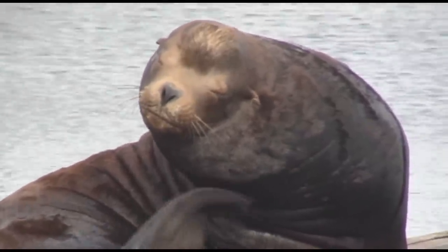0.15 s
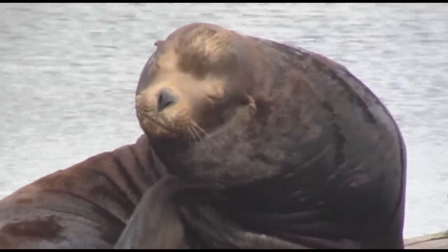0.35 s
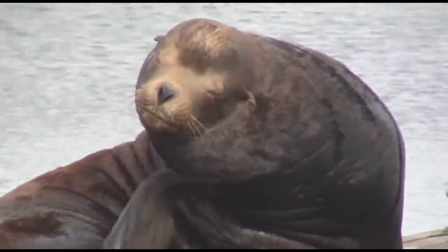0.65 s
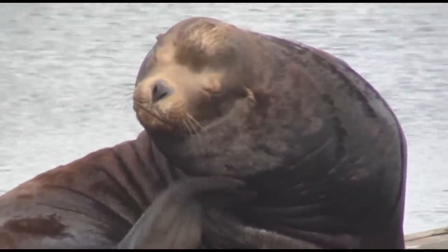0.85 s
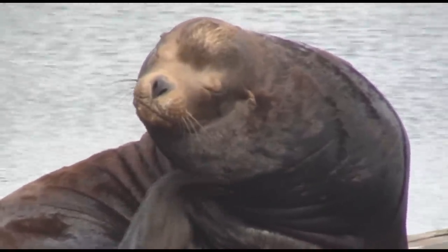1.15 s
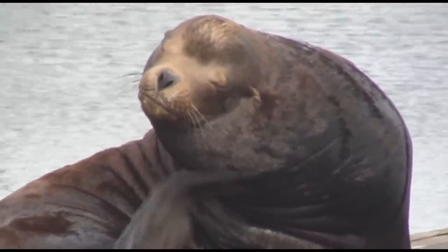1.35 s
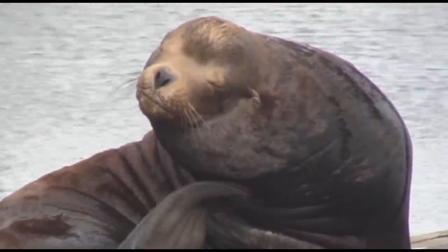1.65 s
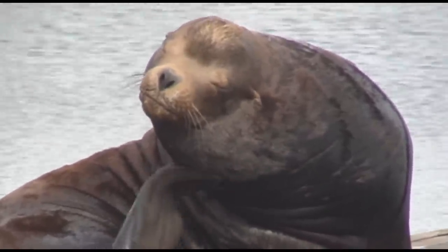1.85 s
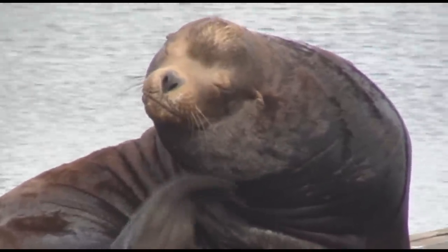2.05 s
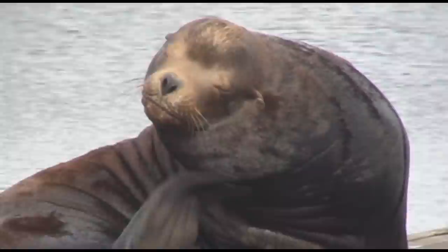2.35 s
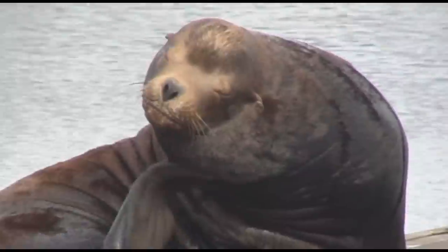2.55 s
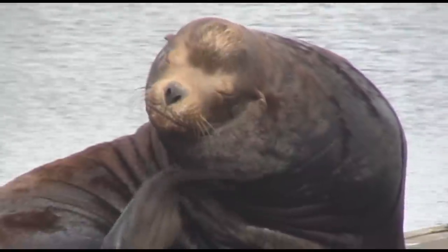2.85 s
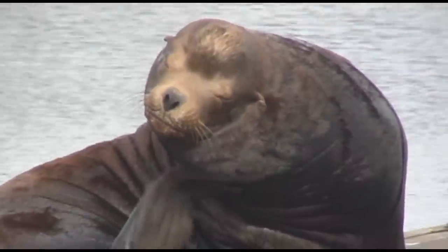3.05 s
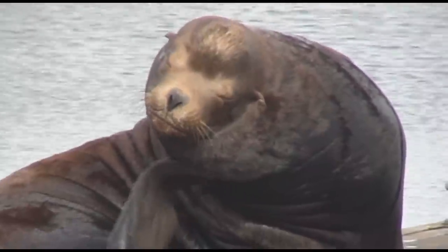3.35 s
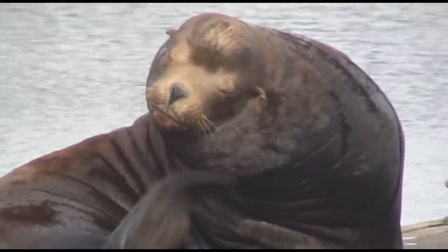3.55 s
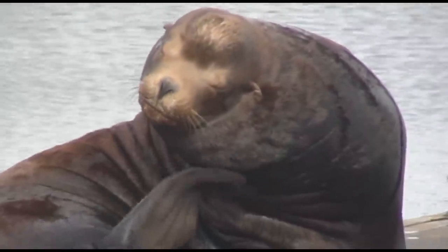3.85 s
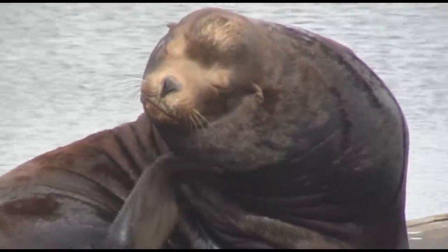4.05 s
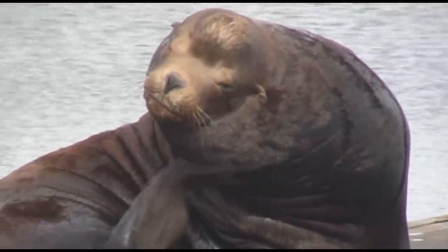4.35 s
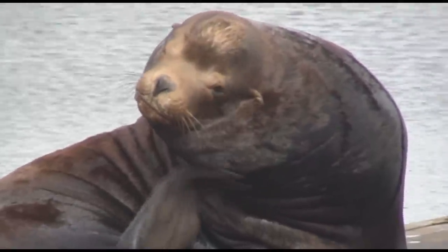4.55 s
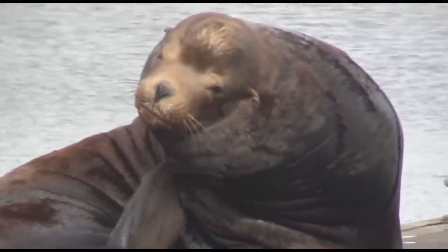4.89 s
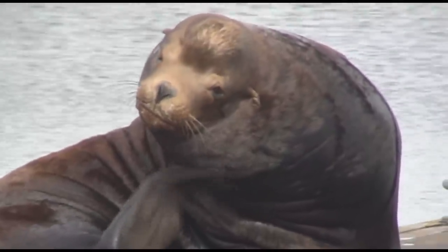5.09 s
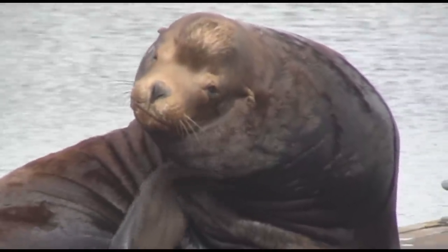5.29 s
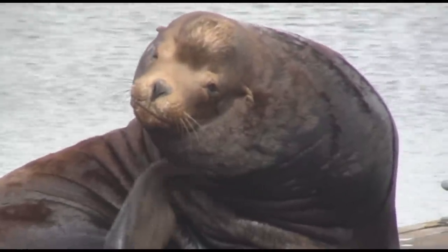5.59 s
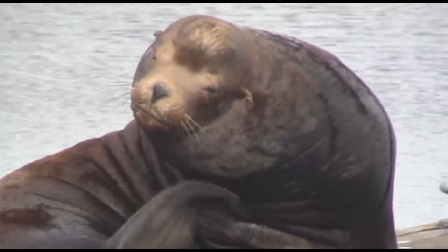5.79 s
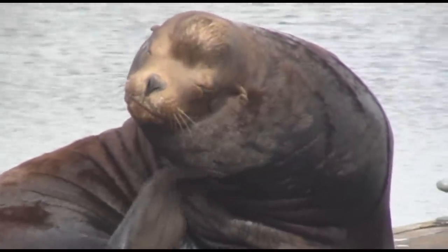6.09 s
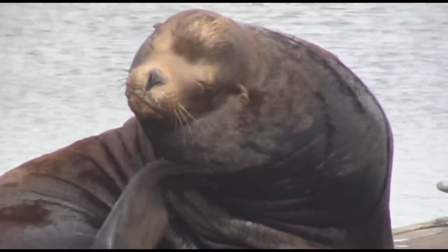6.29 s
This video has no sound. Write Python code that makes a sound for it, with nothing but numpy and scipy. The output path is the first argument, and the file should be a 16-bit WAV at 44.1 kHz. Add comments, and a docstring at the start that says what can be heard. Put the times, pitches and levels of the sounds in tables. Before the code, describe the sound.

A sea lion barks in a rapid, even series, then tires and stops, over a low engine hum and gusty wind.

```python
"""Sea lions in a harbour

A sea lion barks about three times a second, tires and stops; a second answers once from farther off.
Each bark is a rough arch of pitch whose second harmonic sweeps through the throat's main resonance
and echoes over the water. An engine hums, wind buffets the microphone and the open air hisses;
a lens motor whines faintly, the camera body ticks twice, and one soft swish follows the barking."""
import sys
import numpy as np
from scipy import signal
from scipy.fft import rfft, irfft
from scipy.io import wavfile
from scipy.ndimage import uniform_filter1d, map_coordinates

SR = 44100
rng = np.random.default_rng(int(sys.argv[2]) if len(sys.argv) > 2 else 0)


def materialize(psi):
    """Save the field psi as 16-bit PCM at rate SR to the path in sys.argv[1].

    A 1-D psi becomes a single channel; in a 2-D psi each row is a channel.
    """
    bounded = np.clip(np.atleast_2d(psi).T, -1, 1)
    quanta = np.round(bounded * 32767).astype(np.int16)
    wavfile.write(sys.argv[1], SR, quanta)


N = 283412
TIME = np.arange(N) / SR
BIN_HZ = np.arange(N // 2 + 1) * SR / N


def from_db(db):
    """Amplitude ratio of a level in decibels."""
    return 10 ** (np.asarray(db) / 20)


def unit_rms(x):
    """Normalisation to unit mean power."""
    return x / np.sqrt(np.mean(x ** 2) + 1e-20)


def over_time(rows):
    """Linear interpolation of a table's columns between its times."""
    times, *columns = np.transpose(rows)
    return [np.interp(TIME, times, column) for column in columns]


def at_hz(points, hz):
    """Interpolation of a spectrum on a log-frequency axis."""
    knots_hz, values = np.transpose(points)
    return np.interp(np.log(np.maximum(hz, 1)), np.log(knots_hz), values)


def coloured(gain, channels=2):
    """Spectral shaping: independent noises weighted by a gain at each of BIN_HZ, at unit rms."""
    return unit_rms(irfft(rfft(rng.standard_normal((channels, N))) * gain, N))


def drift(rate_hz):
    """Smooth random modulation of unit rms, lying mostly below the given rate."""
    knots = rng.standard_normal(int(2 * rate_hz * N / SR) + 4)
    return unit_rms(map_coordinates(knots, [TIME * 2 * rate_hz], order=2, mode="nearest"))


def butterworth(x, hz, kind):
    """Filtering with a maximally flat passband."""
    return signal.sosfilt(signal.butter(2, hz, kind, fs=SR, output="sos"), x + 1e-18)


def split_bands(x, hz):
    """Zero-phase crossover: a low and a high band that sum to the input."""
    low = signal.sosfiltfilt(signal.butter(4, hz, fs=SR, output="sos"), x)
    return low, x - low


def ring(force, hz, t60_s):
    """Damped resonator: a unit impulse starts a decaying sine of height 1."""
    radius, angle = 10 ** (-3 / (t60_s * SR)), 2 * np.pi * hz / SR
    return signal.lfilter([0, np.sin(angle)], [1, -2 * radius * np.cos(angle), radius ** 2], force + 1e-18)


# Response of throat and muzzle: frequency_hz, gain_db
THROAT_RESPONSE = [(300, -22), (540, -16.5), (750, -11.5), (930, -4.5), (1080, -1), (1270, -7),
                   (1450, -17.5), (1750, -15), (2100, -30.5), (2540, -15), (2800, -29), (3100, -18),
                   (3780, -25.5), (4400, -49)]
# Nasal resonances: centre_hz, width_hz, gain_db
NASAL_RESONANCES = [(5560, 660, -38), (7730, 290, -40.5)]
def vocal_tract(hz):
    """Tract resonance: the gain of broad formants, a falling top and two narrow nasal peaks."""
    formants = from_db(at_hz(THROAT_RESPONSE, hz)) / (1 + (hz / 8000) ** 2)
    nasal = sum(from_db(db) / (1 + (2 * (hz - centre) / width) ** 2)
                for centre, width, db in NASAL_RESONANCES)
    return formants + nasal


def voice(pitch_hz, rough, bright_db, odd_db, jitter, shimmer, tract_scale=1):
    """Source and filter: harmonics of unevenly beating folds; a longer tract lowers the formants."""
    phase = 2 * np.pi * np.cumsum(pitch_hz * (1 + jitter * rough * drift(130))) / SR
    tone = np.zeros(N)
    for k in range(1, 14):
        upper_db = (k > 2) * (bright_db + 3.4 * drift(45))   # the upper harmonics come and go
        source = from_db(odd_db * (k % 2) + upper_db) * np.sin(k * phase)
        tone += vocal_tract(k * pitch_hz * tract_scale) * source
    return np.sqrt(2) * tone * (1 + shimmer * rough * drift(110))


def bark_pitch(progress, grunt_ratio=.755, end_ratio=.65, climb_at=.28, crest_at=.7):
    """Pitch contour as a ratio to the crest: a level grunt, a rounded climb, an ever steeper drop."""
    climb = np.sin(np.pi / 2 * np.clip((progress - climb_at) / (crest_at - climb_at), 0, 1))
    drop = np.clip((progress - crest_at) / (1 - crest_at), 0, 1) ** 3.3
    return grunt_ratio + (1 - grunt_ratio) * climb - (1 - end_ratio) * drop


def articulation(progress, shut_at=.828):
    """Articulation: effort builds, the folds settle, the mouth opens; closing is hoarse and dull."""
    shut = np.clip((progress - shut_at) / (1 - shut_at), 0, 1)
    effort_db = -17 * np.exp(-progress / .15)
    hoarse = .1257 + .876 * np.exp(-(progress / .3564) ** 2) + .37 * shut ** 2
    mouth_treble_db = -6.5 + 9.5 * progress - 10.5 * shut
    return effort_db, hoarse, mouth_treble_db


# Barks of the near animal: start_s, length_s, crest_pitch_hz, source_level_db, brightness_db
NEAR_BARKS = [(-.17, 0.19, 663.4, -27, 6.5), (.152, 0.2, 667.3, -25.5, 1), (.495, 0.21, 673.5, -25.5, -1),
              (0.846, 0.18, 660.8, -27, -2.5), (1.16, 0.18, 651.4, -28, -0.5),
              (1.486, 0.17, 640.6, -26.5, -1.5), (1.802, 0.17, 646.2, -26, 0), (2.114, 0.16, 646, -26, 1),
              (2.423, .16, 631.4, -26, -1.5), (2.731, 0.16, 629.2, -26.5, -1),
              (3.031, .166, 622.4, -26.5, -1.5), (3.362, 0.16, 614.4, -27.5, 0),
              (3.687, 0.16, 601.7, -28, -1), (4.029, 0.15, 582.5, -28.5, -3.5),
              (4.405, 0.14, 548.7, -30.5, -5)]
def barks(release_s=.0052, tiring_s=(2.82, 3.92), rasp_db=-3):
    """Phonation: each bark starts hoarse, clears as its even harmonics take over, and snaps shut."""
    pitch_hz = np.full(N, 420.)
    gain, rough, bright_db = np.zeros((3, N))
    for start, length, crest_hz, level_db, brightness_db in NEAR_BARKS:
        on = (TIME >= start) & (TIME < start + length)
        progress = (TIME[on] - start) / length
        effort_db, hoarse, mouth_treble_db = articulation(progress)
        release = np.minimum((1 - progress) * length / release_s, 1)
        fatigue = np.interp(start, tiring_s, [.646, 1.26])   # the voice roughens as the animal tires
        pitch_hz[on] = crest_hz * bark_pitch(progress)
        gain[on] = release * from_db(level_db + effort_db)
        rough[on] = np.clip(fatigue * hoarse, 0, 1)
        bright_db[on] = brightness_db + mouth_treble_db
    gain = uniform_filter1d(gain, size=150)
    pitch_hz = uniform_filter1d(pitch_hz, size=300)
    odd_db = -4 - 18 * (1 - rough) ** 6
    tone = voice(pitch_hz, rough, bright_db, odd_db, jitter=.04, shimmer=.4)
    tone *= from_db(1.4 * drift(35))
    # Air leaking between the folds hisses in the throat; its treble escapes as the mouth opens.
    leak = coloured(vocal_tract(1.05 * BIN_HZ), channels=1)[0]
    low, treble = split_bands(leak, 1400)
    rasp = from_db(rasp_db) * rough ** 1.05 * (low + from_db(bright_db) * treble)
    return gain * (np.sqrt(1 - .5 * rough ** 2) * tone + rasp)


def off_axis(x, decay_s=.006):
    """Diffraction: bass bends round the head; some treble arrives by detours off body and planks."""
    low, treble = split_bands(x, 1900)
    detours = rng.standard_normal((2, SR // 20)) * np.exp(-TIME[:SR // 20] / decay_s)
    detours /= np.linalg.norm(detours, axis=1, keepdims=True)
    reflected = signal.fftconvolve(treble[None], detours, axes=1)[:, :N]
    return low + .7 * (treble + reflected)


# Reflection off the dock: delay_s, left_db, right_db
DOCK_SLAP = [(.0185, -19, -18)]
def harbour_echoes(x, cloud_db=-6.5, build_s=.0037, hold_s=.11, scatter_t60_s=.44, tail_t60_s=1.1):
    """Reverberation: a slap off the dock, scattering by pilings and hulls, and a faint far tail."""
    # The muzzle beams its upper resonances away from the microphone, so the echoes are brighter.
    x = x + .31 * butterworth(x, [2000, 4200], "band")
    slap = sum(from_db([[left], [right]]) * np.interp(TIME - delay, TIME, x, left=0)
               for delay, left, right in DOCK_SLAP)
    t = TIME[:SR]
    dying_s = np.maximum(t - hold_s, 0)
    scatter = from_db(-60 * dying_s / scatter_t60_s)
    far_tail = from_db(-15 - 60 * dying_s / tail_t60_s)
    cloud = rng.standard_normal((2, SR)) + .4 * rng.standard_normal(SR)   # partly common to both sides
    cloud *= np.hypot(scatter, far_tail) * np.minimum(t / build_s, 1)
    cloud *= from_db(cloud_db) / np.linalg.norm(cloud, axis=1, keepdims=True)
    return slap + signal.fftconvolve(x[None], cloud, axes=1)[:, :N]


# Idling speed: time_s, rate_hz
IDLE_SPEED = [(0, 45.1), (1.3, 44.83), (2.4, 45.2), (2.9, 45.8), (3.6, 45.5), (4.4, 45), (5, 45.5),
              (6.43, 45.1)]
# Engine harmonics: order, left_db, right_db
IDLE_ORDERS = [(2, -43, -27.5), (3, -52.5, -38.5), (4, -78, -51.5), (5, -69, -56)]
def boat_engine(left_lead_rad=1.16):
    """Harmonic series: low orders of an idling engine reach the two sides out of phase."""
    rate_hz = over_time(IDLE_SPEED)[0] * (1 + .0037 * drift(5))
    phase = 2 * np.pi * np.cumsum(rate_hz) / SR
    hum = np.zeros((2, N))
    for order, left, right in IDLE_ORDERS:
        offset = rng.uniform(0, 2 * np.pi) + np.array([[left_lead_rad], [0]])
        hum += np.sqrt(2) * from_db([[left], [right]]) * np.sin(order * phase + offset)
    return hum


# Turbulence spectrum: frequency_hz, relative_db
WIND_SPECTRUM = [(20, -13), (45, 4), (90, 6.5), (160, 0), (230, -9), (330, -18.5), (600, -36)]
# Gusts at the microphone: start_s, length_s, relative_db
WIND_GUSTS = [(0, 0.031, -31.5), (.09, .2, -38), (0.634, .05, -41.5), (0.891, .17, -36), (1.19, .13, -35),
              (1.97, 0.22, -44.5), (2.65, 0.26, -40), (3.12, 0.049, -41), (3.359, .17, -35.5),
              (3.698, .1, -39), (4.559, 0.097, -36.5), (5.206, 0.095, -37.5), (6.3, .13, -45.5)]
def wind(attack_s=.03, release_s=.033, left_gain_db=8, right_gain_db=4):
    """Turbulence, separate at each microphone port: gusts swell, hold and die back into a breeze."""
    strength = from_db(-49.5)   # the breeze
    for start, length, level_db in WIND_GUSTS:
        attack = np.clip(1 + (TIME - start) / attack_s, 0, 1)
        release = np.exp(-np.maximum(TIME - start - length, 0) / release_s)
        strength = np.hypot(strength, from_db(level_db) * attack * release)
    lumps = from_db(2.5 * drift(18))
    turbulence = coloured(from_db(at_hz(WIND_SPECTRUM, BIN_HZ)) / (1 + (BIN_HZ / 700) ** 4))
    return from_db([[left_gain_db], [right_gain_db]]) * strength * lumps * turbulence


# Hiss of water and air: frequency_hz, relative_db
HISS_SPECTRUM = [(140, -35), (230, -6), (357, -7), (383, -7.5), (426, -9), (832, -11.5), (1050, -13),
                 (1410, -18.5), (3290, -26.5), (5680, -31), (15500, -34.5)]
# Balance of the hiss: frequency_hz, left_minus_right_db
HISS_BALANCE = [(200, -0.5), (10500, 1), (12500, -22.5)]
def open_air(correlation=.19, hiss_db=-46, rumble_db=-53):
    """Ambient noise: water and air hiss, weakly correlated between the sides, over a far rumble."""
    left, right, common = coloured(from_db(at_hz(HISS_SPECTRUM, BIN_HZ)), channels=3)
    hiss = np.sqrt(1 - correlation) * np.array([left, right]) + np.sqrt(correlation) * common
    lean = from_db(at_hz(HISS_BALANCE, BIN_HZ))
    equal_power_pan = np.array([lean, np.ones_like(lean)]) * np.sqrt(2 / (1 + lean ** 2))
    hiss = irfft(rfft(hiss) * equal_power_pan, N)
    rumble = coloured(BIN_HZ / (BIN_HZ + 45) / (1 + (BIN_HZ / 210) ** 3))
    return from_db(hiss_db) * hiss + from_db(rumble_db) * rumble


# Eddies striking the microphone: time_s, pitch_hz, left_db, right_db
EDDIES = [(.016, 165, -14, -26), (.022, 190, -30, -17), (2.0755, 220, -12, -32), (4.567, 165, -12, -19),
          (5.281, 170, -14, -18)]
def wind_bumps():
    """Impulse response: each single eddy gives a dull, heavily damped thud."""
    thuds = np.zeros((2, N))
    for start, hz, left, right in EDDIES:
        push = np.zeros(N)
        push[int(start * SR)] = -1
        thuds += from_db([[left], [right]]) * ring(push, hz, t60_s=.028)
    return butterworth(thuds, 450, "low")


# Call of the far animal: time_s, pitch_hz, relative_db
FAR_CALL = [(.715, 353.8, -41.5), (.74, 351.6, -44.5), (.775, 463, -46), (.81, 455.3, -42),
            (.86, 432, -48.5), (.89, 398, -66)]
def answering_bark(gain_db=5.5):
    """Formant scaling: a bigger animal gives a lower, hoarse bark that breaks upwards in pitch."""
    pitch_hz, level_db = over_time(FAR_CALL)
    on = (TIME > FAR_CALL[0][0]) & (TIME < FAR_CALL[-1][0])
    tone = voice(pitch_hz, rough=.8, bright_db=6, odd_db=-3, jitter=.03, shimmer=.5, tract_scale=1.33)
    return on * from_db(level_db + gain_db) * tone


# Runs of the lens motor: middle_s, half_length_s, level_db
MOTOR_RUNS = [(1.3, .32, -71), (6.25, 0.2, -74)]
def lens_motor(pitch_hz=10070):
    """Amplitude gating: a thin, nearly pure whine comes and goes twice."""
    gate = sum(from_db(db) * np.exp(-((TIME - middle) / half) ** 6) for middle, half, db in MOTOR_RUNS)
    return gate * np.sin(2 * np.pi * pitch_hz * TIME + drift(20))


# Whistles on some late barks: start_s, length_s, first_hz, last_hz, level_db
NASAL_WHISTLES = [(2.757, 0.083, 5660, 5700, -58), (3.089, 0.12, 5604, 5626, -49),
                  (3.399, .14, 5630, 5700, -63), (4.441, 0.053, 3760, 4040, -49),
                  (4.446, .075, 2870, 3530, -53)]
def nostril_whistles(waver=.00293):
    """Flow-excited tones: air squeezed through the nostrils sings in brief rising glides."""
    tones = np.zeros(N)
    for start, length, first_hz, last_hz, level_db in NASAL_WHISTLES:
        progress = np.clip((TIME - start) / length, 0, 1)
        hz = (first_hz + (last_hz - first_hz) * progress) * (1 + waver * drift(60))
        swell = from_db(level_db) * np.sin(np.pi * progress) ** 2
        tones += swell * np.sin(2 * np.pi * np.cumsum(hz) / SR)
    return tones


# Slips of the plastic: time_s, level_db, tilt_db_per_octave
PLASTIC_SLIPS = [(3.266, -34.5, 1), (6.273, -35, 0)]
# Modes of the camera body: frequency_hz, gain_db, t60_s
BODY_MODES = [(734, -2.5, .03), (1016, 0, 0.068), (1273, 2.5, 0.036), (2950, 2.5, 0.0063),
              (3320, 0.5, 0.006), (4040, -3.5, 0.0073), (5170, -3.5, 0.0049), (8260, -1, 0.003),
              (12260, -3, 0.0028)]
def camera_ticks(slip_decay_s=.0026, pan_db=2.5):
    """Stick-slip excitation: plastic catches, slips briefly and rings the modes of the camera body."""
    ticks = np.zeros(N)
    t = TIME[:SR // 8]
    for start, level_db, tilt in PLASTIC_SLIPS:
        slip = rng.standard_normal(len(t)) * np.exp(-t / slip_decay_s)
        slip /= np.linalg.norm(slip)
        slip[0] += .5   # the catch
        for k, (hz, gain_db, t60_s) in enumerate(BODY_MODES):
            gain = (-1) ** k * from_db(level_db + gain_db + tilt * np.log2(hz / 1500))
            ticks[int(start * SR):][:len(t)] += gain * ring(slip, hz, t60_s)
    return ticks * from_db([[-pan_db], [pan_db]])


def swish(middle_s=5.05, width_s=.045, level_db=-56):
    """Modulated band noise: one soft, brief, scratchy hiss."""
    swell = np.exp(-((TIME - middle_s) / width_s) ** 2) * from_db(3 * drift(90))
    hiss = unit_rms(butterworth(rng.standard_normal(N), [1900, 4200], "band"))
    return from_db(level_db) * swell * hiss


def scene():
    """Superposition: both animals almost central, the far one with a larger share of echo."""
    near = barks() + nostril_whistles()
    far = answering_bark()
    direct = off_axis(near + from_db(-1.5) * far) * from_db([[-.4], [.4]])
    animals = direct + harbour_echoes(near + far)
    background = boat_engine() + wind() + open_air() + wind_bumps()
    return animals + background + lens_motor() + camera_ticks() + swish()


def record(dry, bass_cut_hz=22, top_cut_hz=15800):
    """Band limiting: the microphone drops the deepest bass, and the top is cut steeply."""
    steep_lowpass = signal.ellip(10, .1, 80, top_cut_hz, fs=SR, output="sos")
    return signal.sosfilt(steep_lowpass, butterworth(dry, bass_cut_hz, "high"))


dry = scene()
out = record(dry)
materialize(out)
```